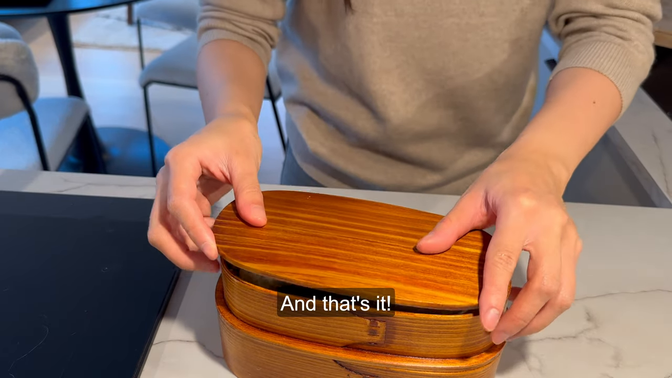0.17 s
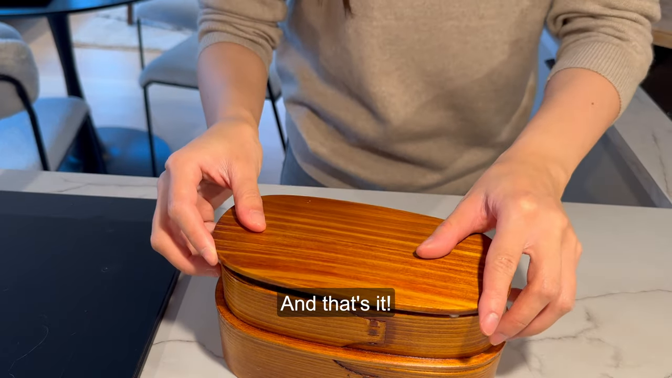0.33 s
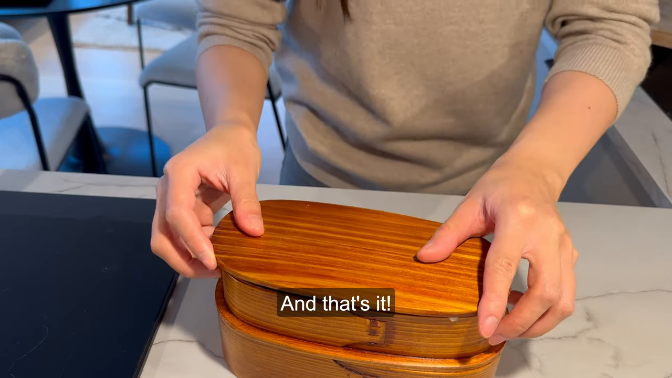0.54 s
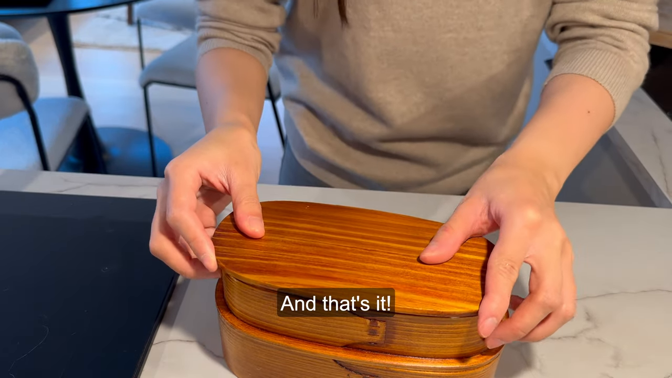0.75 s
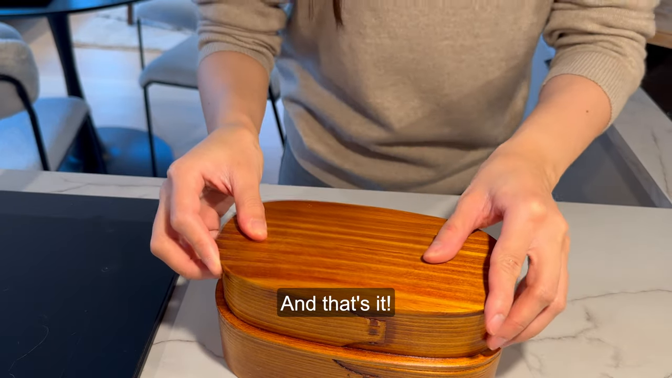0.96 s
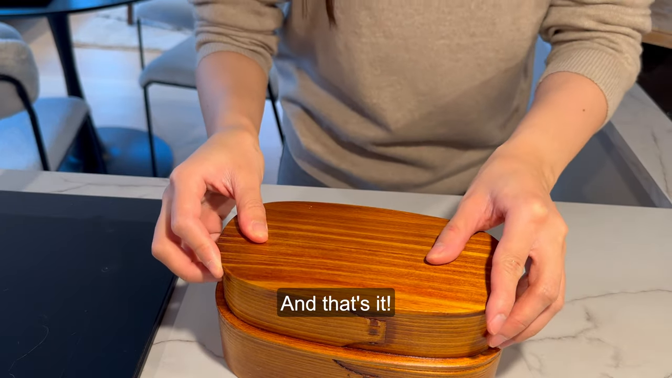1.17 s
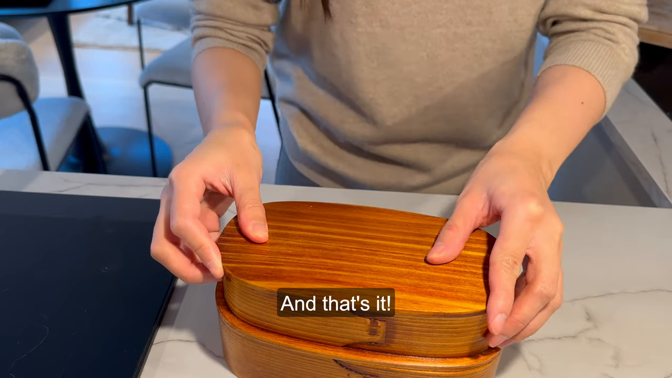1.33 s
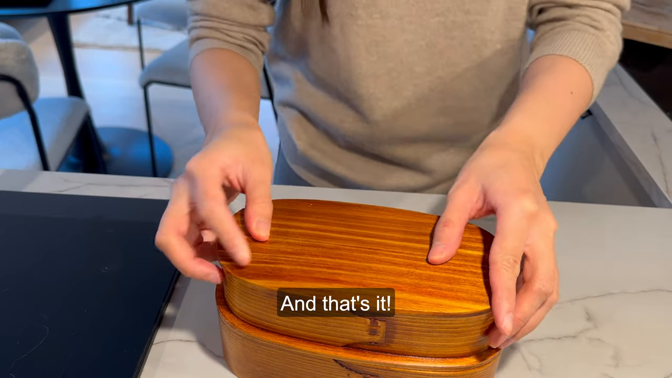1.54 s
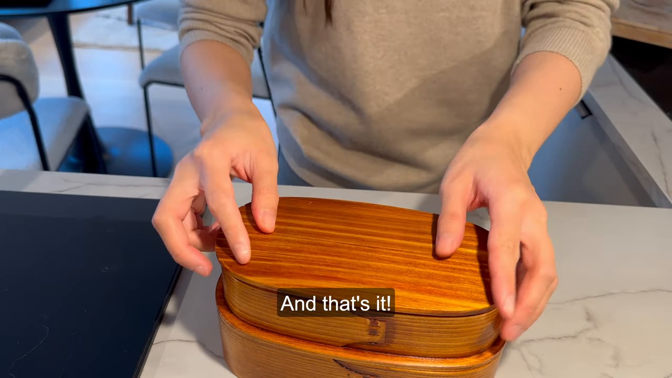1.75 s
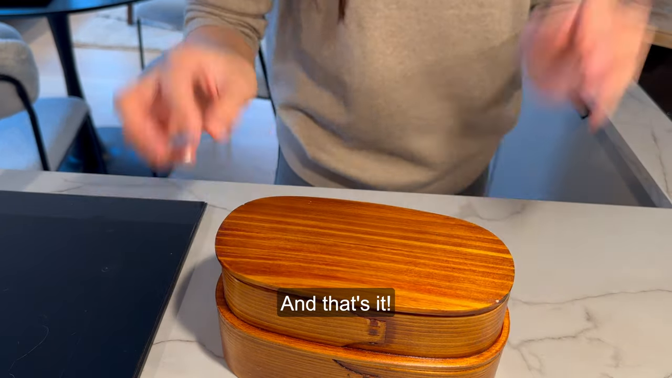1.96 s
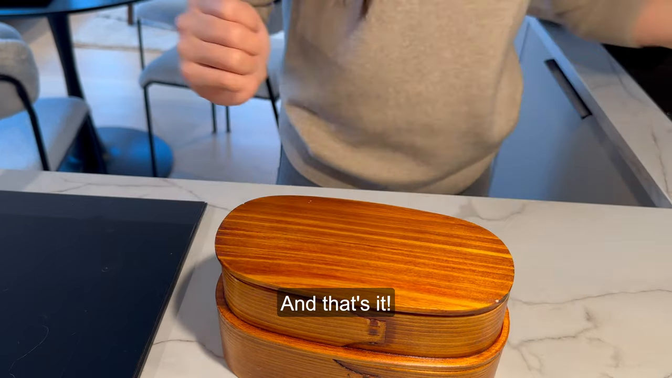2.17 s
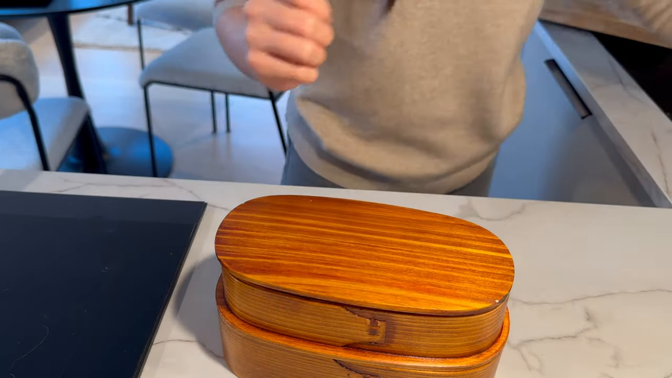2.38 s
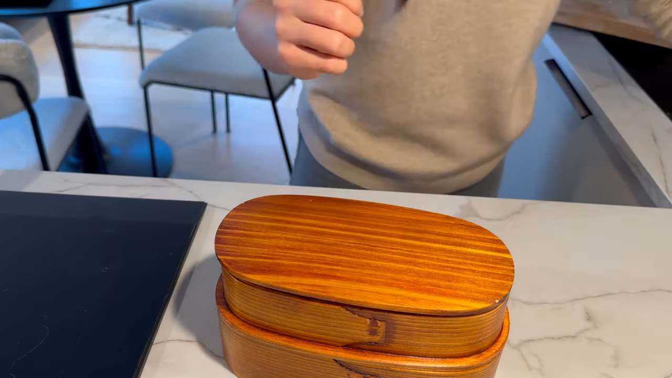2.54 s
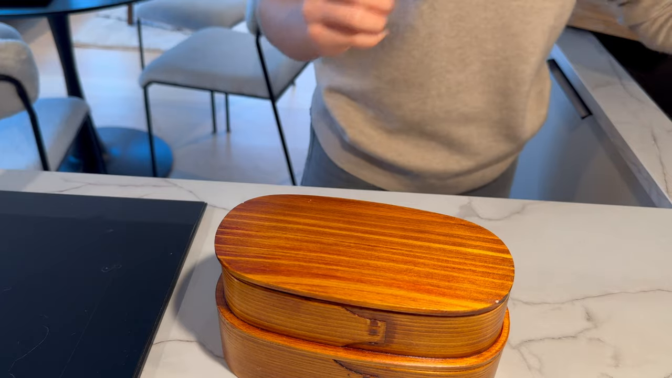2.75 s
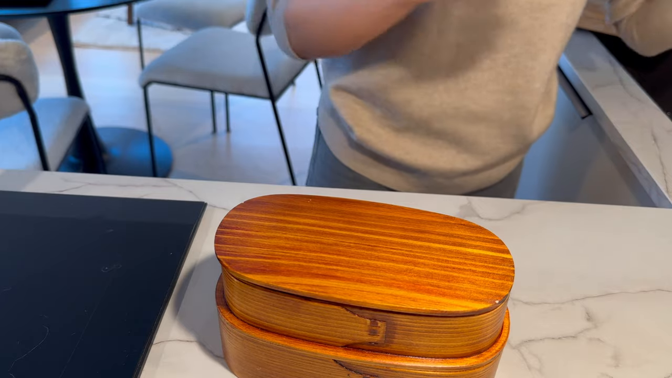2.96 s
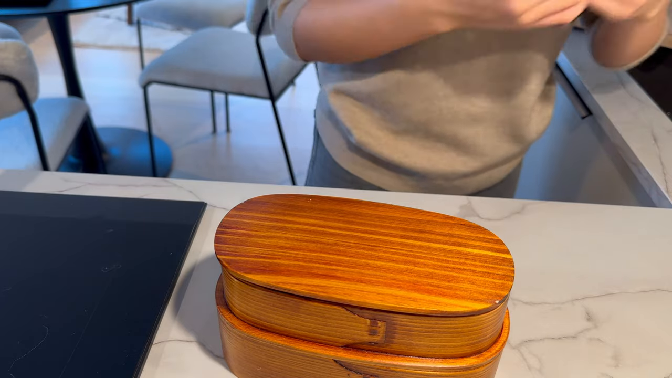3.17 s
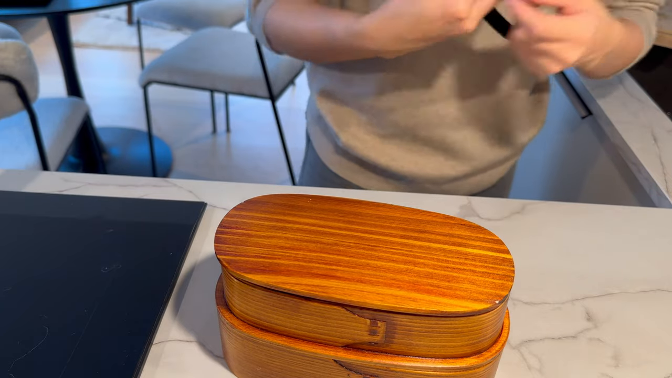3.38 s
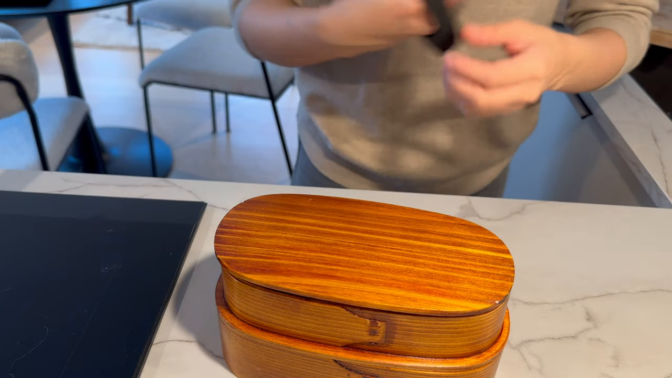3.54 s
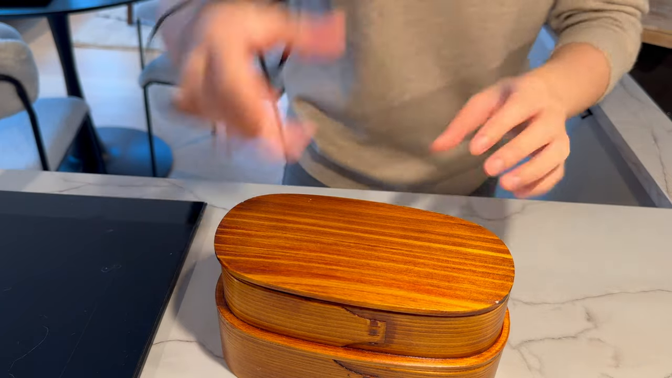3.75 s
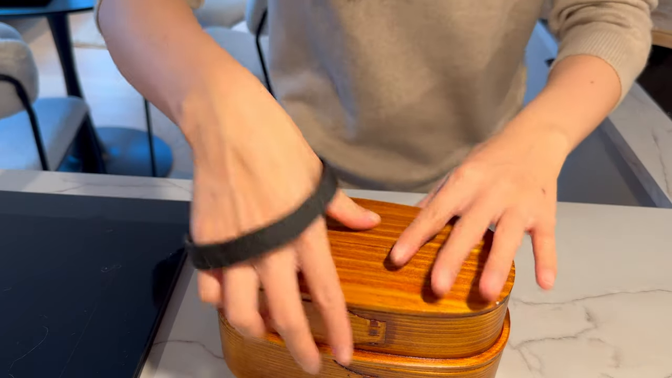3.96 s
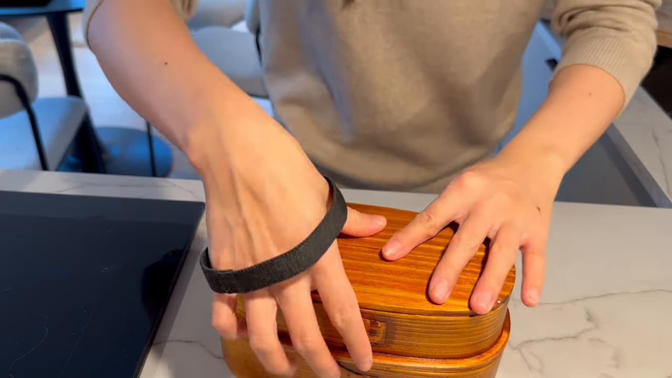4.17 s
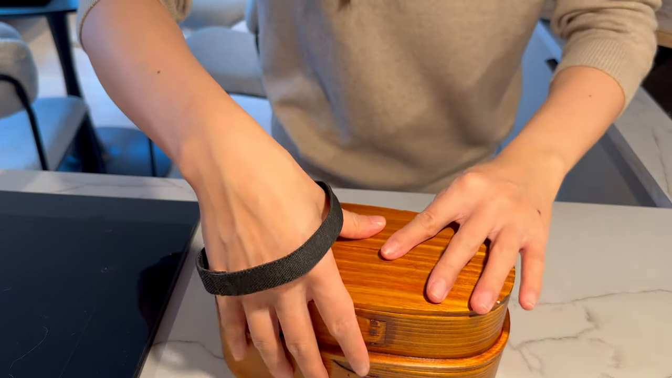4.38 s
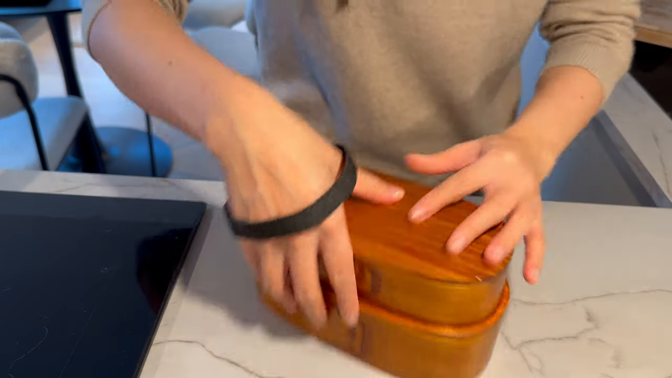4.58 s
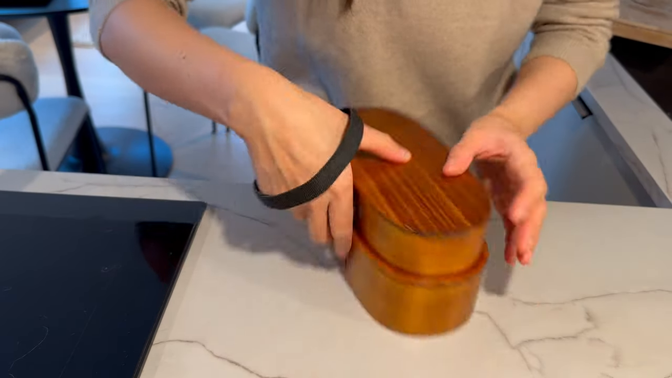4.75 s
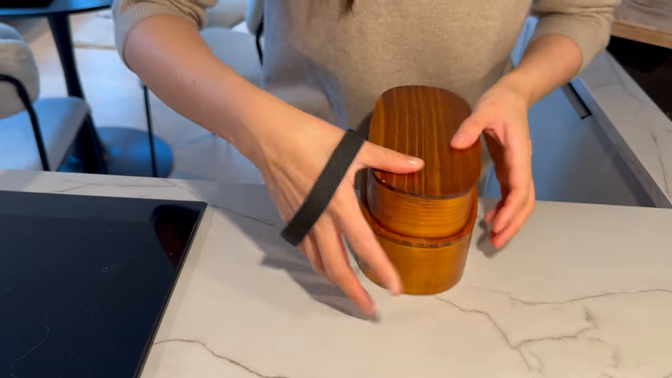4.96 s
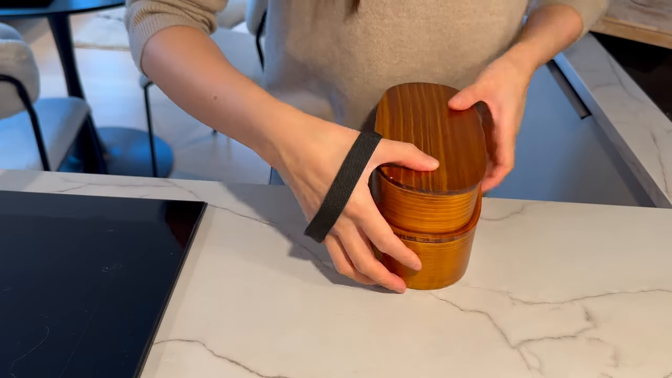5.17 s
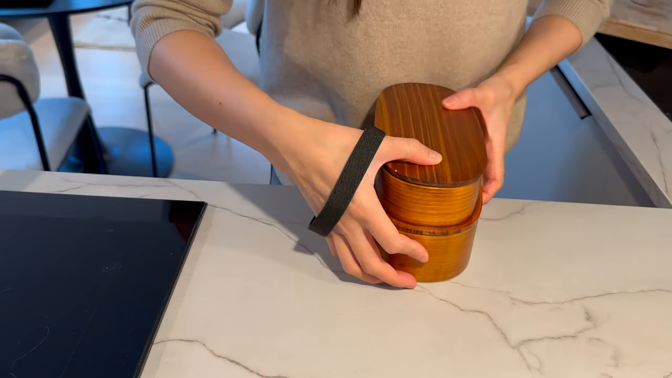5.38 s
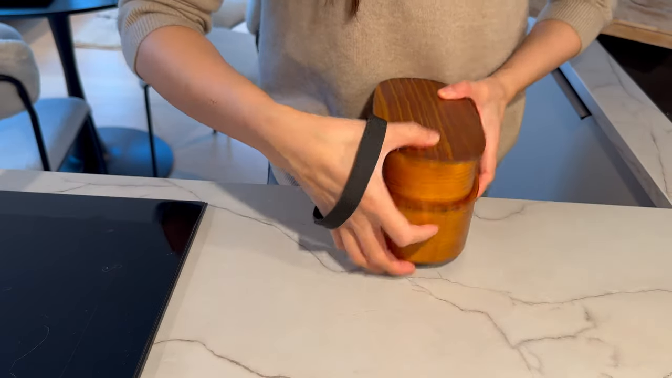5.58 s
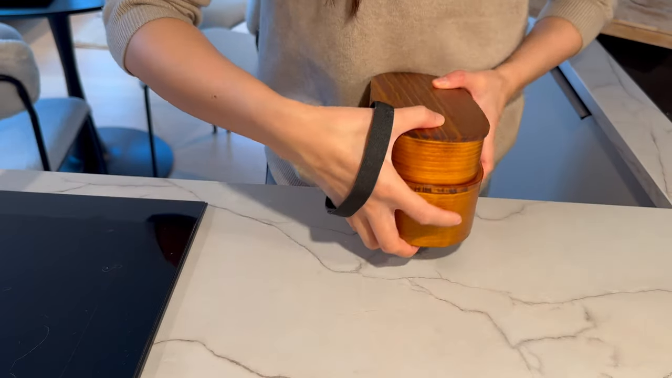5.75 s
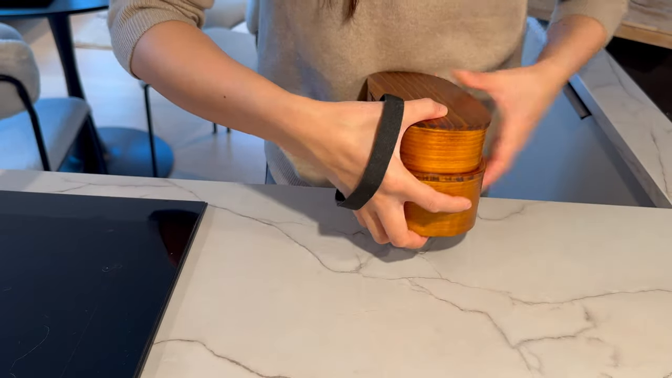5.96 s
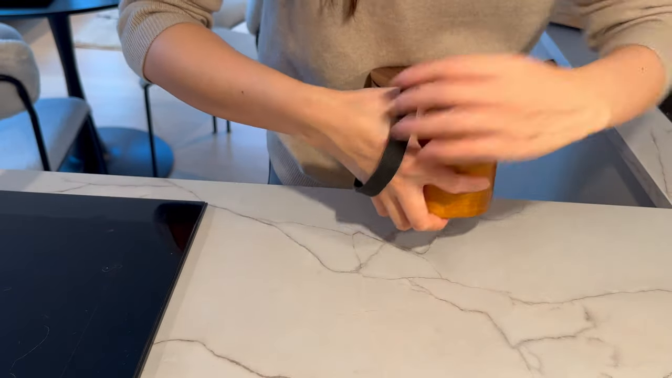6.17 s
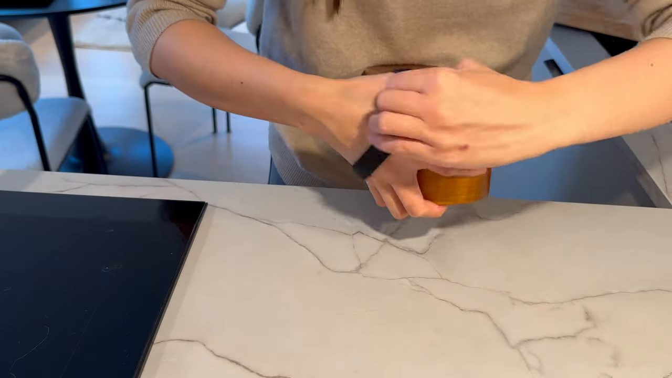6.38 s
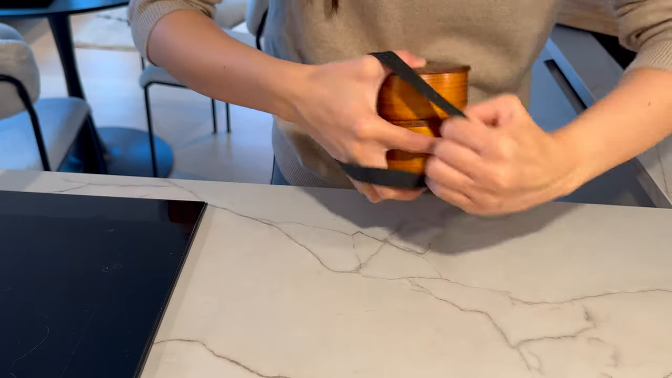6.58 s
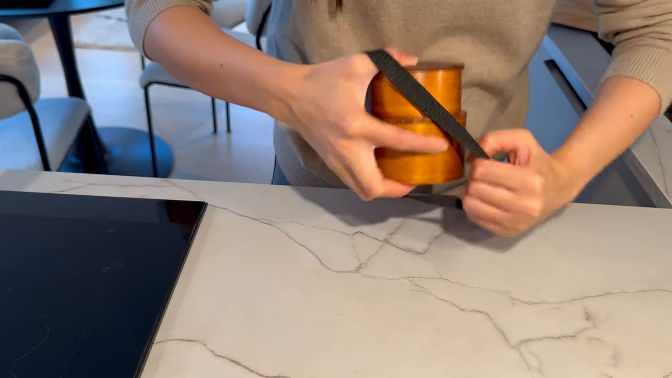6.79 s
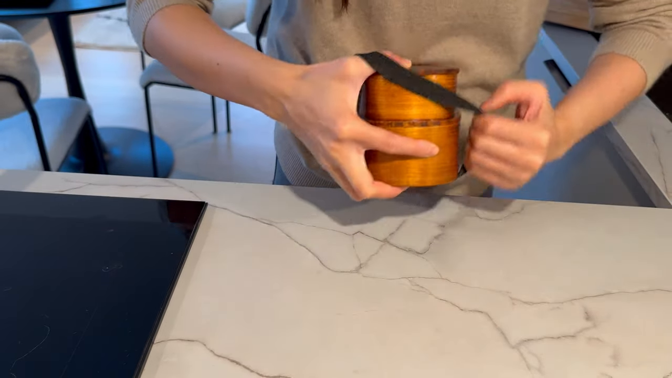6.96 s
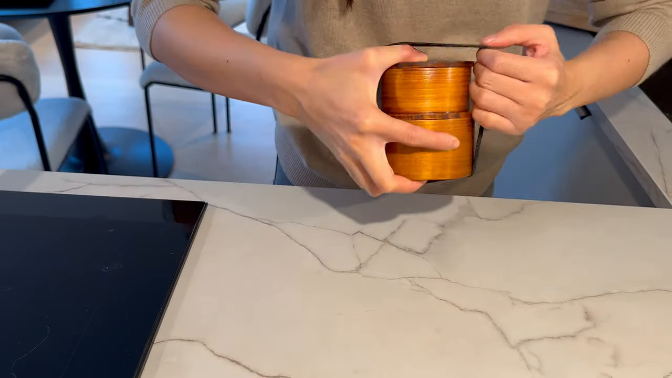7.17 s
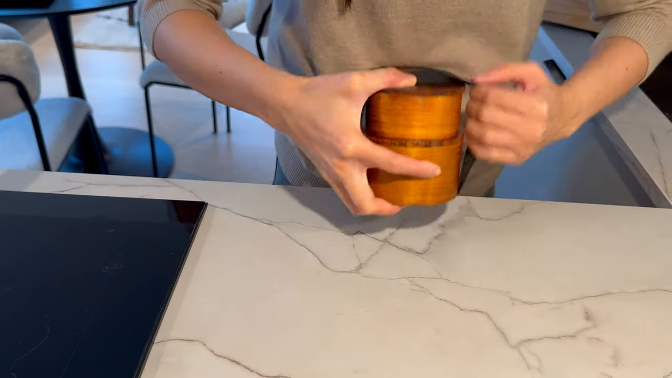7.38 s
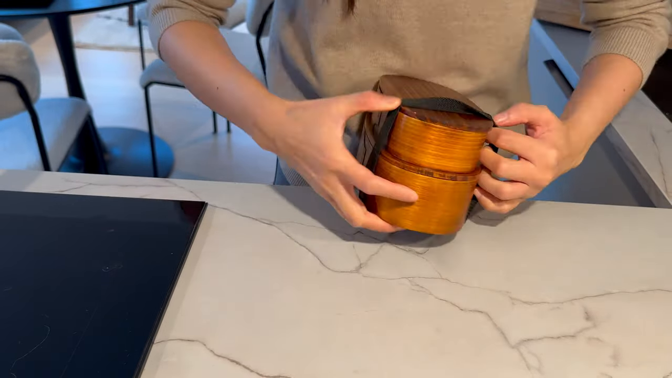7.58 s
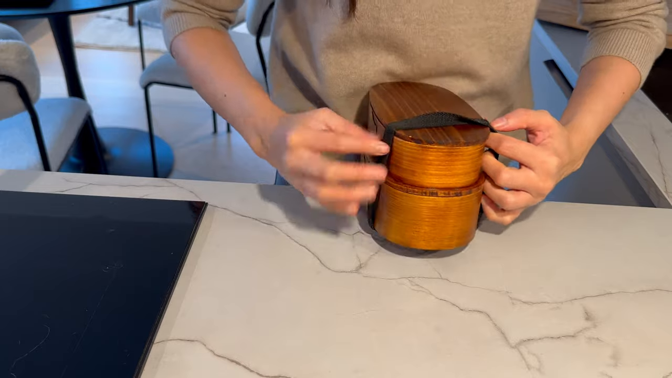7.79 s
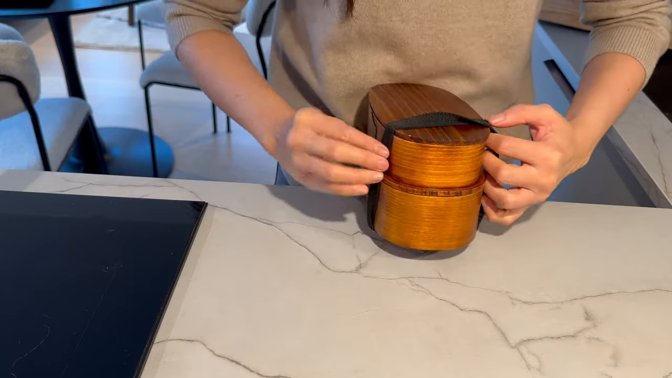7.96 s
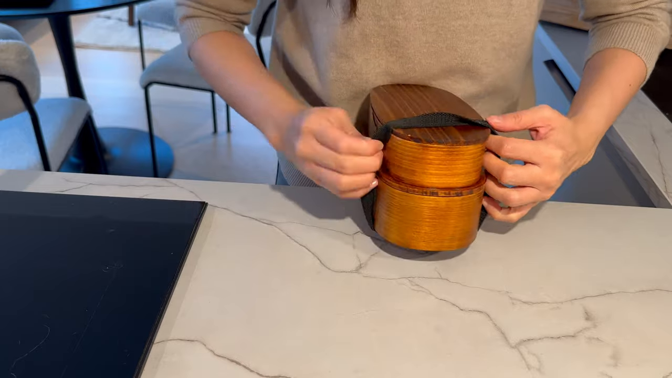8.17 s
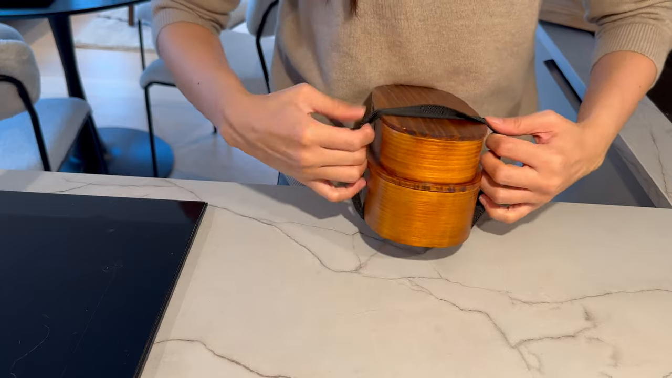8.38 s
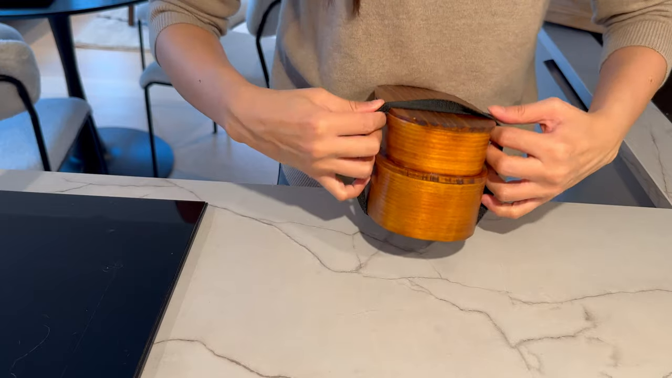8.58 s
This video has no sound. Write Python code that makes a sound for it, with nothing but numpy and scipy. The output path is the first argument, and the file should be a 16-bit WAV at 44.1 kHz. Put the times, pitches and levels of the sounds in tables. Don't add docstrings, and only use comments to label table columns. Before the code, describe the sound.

Close hollow wooden knocks and a hard lid clack, later a slap, scraping slide, elastic snap and heavy set-down over faint kitchen fan hum.

```python
import sys
import numpy as np
from scipy import signal
from scipy.fft import rfft, irfft, next_fast_len
from scipy.io import wavfile
from scipy.ndimage import uniform_filter1d, map_coordinates

SR = 44100
rng = np.random.default_rng(int(sys.argv[2]) if len(sys.argv) > 2 else 0)


def digitize_waveform(pressure):
    field = np.atleast_2d(pressure).T
    bounded = np.clip(field, -1, 1)
    quanta = np.round(bounded * 32767).astype(np.int16)
    wavfile.write(sys.argv[1], SR, quanta)


def decibels_to_gain(level_db):
    exponent = np.asarray(level_db, float) / 20
    return 10 ** exponent


N = 380583

# [f/Hz, density/dB per Hz]
FAN_SPECTRUM = [(88, -20), (150, -0.5), (254, -5.5), (285, -10.5), (308, -11), (333, 2), (408, -23),
                (436, -5.5), (559, 2), (618, -50), (676, 0), (774, -21), (980, -16.5), (1070, -5.5),
                (2200, -36), (2860, -64.5), (4840, -120)]
# [f/Hz, width/Hz, level/dB]
FAN_LINES = [(529, 4.7, -64), (727, 7.4, -66.5)]
# [f/Hz, density/dB per Hz]
RUMBLE_SPECTRUM = [(8.8, -36.5), (15, 6.5), (32, -3.5), (70, 5), (84, -5), (102, 2), (161, -13.5),
                   (200, -38), (260, -53), (440, -120)]
# [f/Hz, density/dB per Hz]
HISS_SPECTRUM = [(1000, -23.5), (1700, -18.5), (2520, -2), (2710, -10.5), (3040, -6.5), (3300, -10),
                 (5080, 0.5), (6540, -5.5), (7110, -7), (9590, -6.5), (10400, -5), (15200, -5.5),
                 (15900, -9.5)]
# [f/Hz, t60/s]
ROOM_DECAY = [(100, 0.31), (1200, 0.24), (5000, 0.14), (12000, 0.078)]
FAN_DB, HISS_DB, BUILDING_DB, SWAY_DB = -53.5, -72, -52, -60.5
SHAKE_DB, SHAKE_T60_S = -32, 0.94
KICK_DB, KICK_T60_S, KICK_RISE_S = -29.5, 1.5, 0.069
LIFTED_S = 5

# [f/Hz, density/dB per Hz]
SKIN_SPECTRUM = [(1000, -21.5), (1700, -1), (1840, -2), (2040, -7), (2170, -2), (2870, -0.5), (3310, -3),
                 (4250, -2), (5160, -0.5), (5640, 0), (6320, -9), (7130, -4), (8500, -58.5), (11000, -49.5),
                 (18700, -120)]
# [f/Hz, width/Hz, level/dB]
SKIN_RINGS = [(1850, 55, 3.5), (2090, 52, -7.5), (3280, 140, -2.5), (4045, 90, -1), (4500, 120, 0),
              (5160, 190, 5), (5750, 97, 4), (6960, 230, 2.5)]
# [f/Hz, density/dB per Hz]
AIRY_SPECTRUM = [(4410, -18), (7500, 4.5), (8970, -1), (15100, 1), (15900, -2)]
# [f/Hz, width/Hz, level/dB]
RUBBED_WALLS = [(1060, 100, -2.5), (1190, 75, -0.5), (1260, 42, 5), (1410, 130, -4.5)]
# [f/Hz, width/Hz, level/dB]
RUBBED_HOLLOW = [(230, 22, -1.5), (335, 82, -2.5), (408, 55, 4.5), (560, 130, 0.5), (642, 120, 2),
                 (815, 270, -5)]
# skin, airy, wall, hollow [level/dB]
RESTING_DB = [-74.5, -79, -62, -59]
# [peak t/s, rise/s, fall/s, hiss level/dB, wood/dB re hiss]
HAND_STROKES = [(0.0, .1, 0.25, -61, 4), (.344, 0.028, 0.046, -60, 21.5), (.41, 0.027, 0.33, -62.5, 16.5),
                (.695, .005, 0.064, -54, 7.5), (.716, 0.013, 0.022, -47, 6),
                (.757, 0.015, 0.093, -34.5, 3.5), (.815, .04, .07, -52.5, 3), (.885, 0.014, 0.035, -39, 3),
                (.97, .08, 0.044, -52, 0.5), (3.85, 0.028, 0.18, -52, -11),
                (4.005, 0.073, 0.086, -56.5, 20.5), (4.19, 0.093, 0.098, -66, 13.5),
                (4.265, 0.11, 0.054, -54, 2), (4.96, 0.51, 0.124, -59, 15), (5.11, 0.034, 0.033, -50, 7),
                (5.22, 0.16, 0.25, -57.5, 10.5), (5.36, 0.18, 0.18, -52, 9.5),
                (5.65, 0.042, 0.17, -60.5, -6), (5.74, 0.19, 0.087, -55, 2), (5.89, 0.17, 0.047, -48.5, 3),
                (7.31, .03, .1, -65.5, 15.5), (7.375, 0.092, 0.2, -45.5, 2.5), (7.42, 0.11, 0.25, -45.5, 3),
                (7.5, 0.12, 0.078, -71, 10), (7.63, 0.061, 0.17, -51.5, 5), (7.69, 0.018, 0.39, -68, 18.5),
                (7.85, 0.61, 1, -57, 4), (8.32, 0.13, 0.28, -54.5, 7), (8.59, 0.078, 0.18, -54, 5)]
# [peak t/s, rise/s, fall/s, hiss level/dB, wood/dB re hiss]
CLOTH_STROKES = [(1.37, 0.078, 0.4, -65.5, 2.5), (1.57, 0.296, 0.32, -69, 8), (1.95, 0.15, .3, -72, 10),
                 (3.36, 0.2, 0.44, -63.5, -18), (4.09, 0.039, 0.026, -55, 5.5),
                 (5.07, 0.26, 0.091, -52, -25), (5.555, 0.085, 0.061, -49.5, -1),
                 (5.865, 0.077, 0.047, -52, 3), (6.46, 0.47, 0.66, -58, -2),
                 (6.66, 0.088, 0.031, -48.5, -2), (6.78, 0.21, 0.38, -48.5, -3.5),
                 (6.96, 0.12, 0.16, -53, 0), (7.0, 0.014, 0.052, -40, 5.5), (7.04, .03, 0.062, -54, 9),
                 (7.173, 0.0048, 0.019, -46, 8.5), (7.2, 0.081, 0.16, -63, 6),
                 (7.215, 0.0055, .015, -47, 7), (7.26, 0.056, 0.11, -57, 2.5)]
# [t/s, hiss level/dB]
PRICKS = [(.327, -57), (.36, -58), (.573, -66), (.695, -45.5), (5.0978, -43), (5.119, -48.5), (5.2786, -63),
          (6.625, -49.5), (6.658, -43), (6.684, -51), (6.802, -51), (6.839, -45), (6.912, -53),
          (7.017, -42), (7.281, -62), (7.2945, -56), (7.309, -57), (7.325, -54.5), (7.358, -44.5),
          (7.794, -56), (7.806, -47), (8.222, -48.5), (8.275, -49.5), (8.3221, -56)]
# [t/s, friction level/dB]
SLIDES = [
    [(4.3, -63), (4.325, -64), (4.345, -52), (4.4, -42.5), (4.43, -42), (4.56, -41), (4.66, -38.5),
     (4.75, -39), (4.8, -41.5), (4.9, -48.5), (4.98, -70)],
    [(8.04, -60.5), (8.066, -54), (8.09, -44.5), (8.15, -43), (8.195, -42.5), (8.21, -48), (8.24, -45),
     (8.256, -50.5), (8.3, -64)],
]
HAND_AIRY_DB, CLOTH_AIRY_DB, SLIDE_AIRY_DB = -9, -5, -6.5
HOLLOW_DB, SLIDE_HOLLOW_DB = -1.5, -4
SLIDE_WOOD_DB = (4, 0.5)
BRIGHTENS = 0.4
PRICK_RISE_S, PRICK_FALL_S, PRICK_AIRY_DB, PRICK_WOOD_DB = 0.0024, 0.01, -4, -3.5
RATTLE_DB, RATTLE_T60_S, RATTLE_LAG_S = -31.5, 0.48, 0.034
# skin, airy, wall, hollow [level/dB]
RATTLE_SHARE_DB = [-18, -39.5, 0, -4]

# [t/s, level/dB, lower mode/dB re upper, third mode/dB re upper]
THUMPS = [(0.308, -26.5, -25, -8), (0.37, -28, -8, 0), (0.439, -20, -7, -21), (0.48, -23, 0.5, -15),
          (0.519, -25, -21, -26), (0.792, -10, 2, -21), (0.894, -10, 5.5, -4.5), (3.862, -34.5, 10, -11),
          (3.929, -26, 2.5, 5.5), (4.111, -42, 3, -5), (4.439, -46, 4, -3), (4.6, -39, 4, -2),
          (5.13, -34, -1, 2), (5.296, -34, 5.5, 2), (5.44, -29.5, -4, -5), (7.4827, -17.5, -12, 5.5),
          (7.6528, -4, -8, -4), (8.398, -35.5, -31, -1.5)]
# [f/Hz, t60/s]
COUNTER_MODES = [(108, .25), (82.4, 0.25), (234, 0.081)]
LIFTED_COUNTER_HZ, LIFTED_COUNTER_T60_S = 114.1, 0.26

# [f/Hz, level/dB]
HOLLOW_MODES = [(230, -9), (300, -0.5), (390, 5), (500, 0.5), (590, 3.5), (660, -2), (815, -0.5)]
# [t/s, level/dB, favoured f/Hz, t60/s]
BUMPS = [(0.082, -24, 397, 0.019), (0.3021, -17.5, 393, 0.032), (0.395, -18.5, 402, 0.077),
         (0.432, -12, 390, 0.027), (0.476, -26, 275, 0.098), (0.693, -21.5, 678, 0.028),
         (0.7498, -14, 800, 0.015), (0.771, -4, 388, 0.028), (0.884, -1.5, 473, 0.037),
         (3.859, -7.5, 340, 0.02), (3.926, -19.5, 236, 0.16), (4.887, -11.5, 340, 0.02),
         (5.097, -21, 283, 0.03), (5.295, -19.5, 350, 0.042), (5.329, -29, 288, 0.04),
         (5.44, -25.5, 232, 0.045), (5.877, -24, 233, 0.044), (6.38, -30, 396, 0.086),
         (6.433, -23.5, 527, 0.083), (6.656, -21.5, 300, 0.03), (6.994, -47, 361, 0.032),
         (7.486, -11, 300, 0.035), (8.239, -19, 447, 0.023)]
# [t/s, level/dB, centre f/Hz, length/ms]
TICKS = [(0.7712, -32, 2650, 0.8), (0.7903, -24, 3100, 1), (0.7908, -36, 5050, 1.8), (0.7905, -41, 9500, 1),
         (0.7525, -48, 5380, 4), (0.885, -43, 5190, 4), (0.893, -44, 3000, 1.2), (0.972, -60, 2690, 3),
         (3.8298, -40, 2250, 1), (3.8932, -53, 2300, 1.5), (3.947, -50, 2250, 3), (3.966, -51, 2300, 4),
         (4.012, -52, 1950, 3), (4.165, -72, 2850, 20), (4.23, -70, 3000, 14), (5.53, -64, 7100, 18),
         (5.535, -63, 5400, 16), (4.0916, -53, 6810, 2.3), (4.7497, -46, 3457, 2.3), (5.084, -57, 7100, 3),
         (7.657, -38, 1850, 2), (8.2415, -47, 4500, 1), (7.309, -57, 11200, 2), (7.3729, -44, 5100, 2.4),
         (7.71, -51, 4960, 1.9)]
# [t/s, level/dB]
SNAPS = [
    (6.998, -10.5),
    (7.017, -20.5),
]
# [f/Hz, level/dB, t60/s]
PINCHED_MODES = [(594, -15, 0.14), (1116, 4, 0.047), (1530, 2.5, 0.027)]

# [f/Hz, level/dB, share of t60]
WALL_MODES = [(1032, 0, 0.98), (1143, -11, .8), (1190, -1, 1), (1255.4, 3, 1), (1510, -5, 0.14)]
# [f/Hz, width/Hz, level/dB]
CRACK_RESONANCES = [(1870, 60, -7), (2240, 330, 4), (2680, 350, 0), (2940, 600, -2.5), (3580, 910, 0),
                    (4500, 400, 0), (5400, 420, 2), (6620, 1400, -8.5), (11000, 8300, -25)]
# [t/s, ring level/dB, favoured f/Hz, crack/dB re ring, ring t60/s]
LID_KNOCKS = [(0.083, -43, 1030, -16, 0.048), (0.3026, -27, 1210, -33, .06), (0.322, -49, 1220, -24, .05),
              (0.343, -49.5, 1220, -5, .12), (0.395, -31, 1210, -22, 0.07),
              (0.4016, -29.5, 1270, -18.5, 0.075), (0.4087, -36, 1240, -16.5, 0.05),
              (0.4345, -26, 1220, -22, 0.049), (0.4787, -34.5, 1270, -17, 0.11),
              (0.5085, -32, 1260, -18.5, 0.078), (0.575, -50.5, 1250, -12, .04),
              (0.693, -31.5, 1320, -16, .025), (0.7505, -18.5, 1150, -22.5, .07),
              (0.7714, -21.5, 1017, -12.5, .07), (0.78, -18, 1240, -26.5, .05),
              (0.788, -12, 1290, -9, 0.034), (0.7967, -12, 1270, -35.5, 0.025),
              (0.8797, -19, 1150, -14, 0.034), (0.884, -13, 1260, -22.5, 0.045),
              (0.891, -13.5, 1250, -19.5, 0.052), (1.3675, -51.5, 1366, -7, .05)]
# [t/s, ring level/dB, favoured f/Hz, crack/dB re ring, ring t60/s]
TAP_KNOCKS = [(3.8297, -13, 1150, -16, 0.022), (3.8588, -14, 1220, -35, 0.032),
              (3.8932, -23.5, 1200, -18.5, 0.016), (3.9263, -16, 1260, -8.5, 0.04),
              (3.9442, -20, 1240, -29, 0.02), (3.9765, -23.5, 1260, -31, 0.029),
              (3.988, -26, 1260, -30, 0.086), (4.022, -22.5, 1260, -31, 0.08),
              (4.336, -30.5, 1290, -22, 0.085), (4.5942, -22, 1190, -14, 0.036),
              (4.8889, -22.5, 1140, -22, 0.096), (5.0998, -25.5, 1250, -25, 0.021),
              (5.1076, -27.5, 1160, -29, 0.031)]
# [t/s, ring level/dB, favoured f/Hz, crack/dB re ring, ring t60/s]
GRIT_CATCHES = [(4.3563, -36, 1250, -14, 0.043), (4.3787, -40, 1230, -5, .04),
                (4.4231, -29, 1250, -12.5, 0.049), (4.458, -34, 1270, -17, 0.031),
                (4.5164, -40, 1250, -21, .04), (4.5304, -24.5, 1230, -16, .04),
                (4.6162, -23.5, 1250, -24, 0.032), (4.632, -24.5, 1260, -20.5, 0.036),
                (4.656, -26.5, 1270, -21, 0.056), (4.7, -26.5, 1230, -22, 0.045),
                (4.7344, -30, 1250, -12, 0.047)]
# [t/s, ring level/dB, favoured f/Hz, crack/dB re ring, ring t60/s]
HELD_KNOCKS = [(6.4328, -47, 1060, -25, 0.1), (6.656, -39, 1290, -19, 0.12),
               (6.855, -39.5, 1250, -4, 0.088), (6.8837, -40.5, 1310, -0.5, 0.039),
               (6.9968, -25, 1140, -11, 0.018), (7.1712, -45.5, 1050, -2, .034),
               (7.214, -47, 1076, -5.5, 0.045), (7.257, -47.5, 1210, 0, 0.046),
               (7.656, -12.5, 1230, -16.5, 0.023), (8.2421, -32, 1250, -10, 0.079),
               (8.398, -33, 1360, -21, 0.017)]
# [t/s, ring level/dB, favoured f/Hz,
# crack/dB re ring, ring t60/s]
FURTHER_KNOCKS = [(3.9515, -21, 1250, -40, 0.026), (3.969, -41, 1400, -22, .03),
                  (4.006, -42, 1250, -27, 0.026), (4.013, -28, 1200, -24, .03),
                  (4.7505, -32, 1250, -19, .04), (7.384, -38, 1205, -25, .04),
                  (7.417, -31.5, 1250, -25, 0.036), (7.444, -30, 1100, -25, .04),
                  (7.7, -22.5, 1350, -30, 0.023), (7.712, -22.5, 1250, -26, 0.044),
                  (8.072, -40, 1250, -20, .05), (8.1, -34, 1250, -16.5, 0.036)]
LID_MS, TAP_MS, CATCH_MS, HELD_MS = 3.2, 2.5, 4.8, 2.6
MIDDLING_DB, LINGERS = -31, 0.2
SWELL, REBOUND_SIZE = 0.3, 0.3

# [t/s, level/dB, swell/ms]
BLOWS = [
    (0.7899, -3.5, .5),
    (3.9274, -1.5, 2.1),
    (7.6559, 0, 0.92),
]
# [f/Hz, level/dB, t60/s]
LID_HOME_MODES = [(236, -23, .11), (422, 4.5, 0.027), (405, -21.5, .14), (559, -21, 0.14),
                  (675, -11.5, 0.096), (813, -9.5, 0.091), (900, -25.5, 0.11), (1279, 2, 0.05),
                  (1250, -18.5, 0.07), (2226, -23.5, 0.094), (2430, -1, 0.012), (3120, -16.5, 0.0043)]
# [f/Hz, level/dB, t60/s]
LID_SLAP_MODES = [(241, -31, 0.13), (326, -16, 0.043), (403, -33, 0.15), (487, -29, 0.14),
                  (633, -13.5, 0.038), (1020, -12, 0.067), (1244, 2.5, 0.051), (1205, -11, 0.074),
                  (2170, -11.5, 0.021), (2360, -38, 0.13), (2805, -18, 0.021), (3380, -34, 0.01),
                  (1450, -23, 0.07)]
# [f/Hz, level/dB, t60/s]
SET_DOWN_MODES = [(225.6, -21, 0.2), (291, -3, 0.065), (363, -5.5, 0.086), (512, -3, 0.025),
                  (592, 4.5, 0.02), (652, -6.5, 0.06), (745, 0, .025), (930, -9.5, 0.08), (1078, -12, .12),
                  (1218, 2, .035), (1186, -24.5, 0.41), (1292, -14.5, 0.2), (1600, -25.5, 0.12),
                  (1826, -18.5, 0.043)]


def unit(x):
    return x / np.sqrt(np.mean(x ** 2) + 1e-20)


def along(points, hz):
    f, v = np.transpose(points)
    return np.interp(np.log(hz + 1), np.log(f + 1), v)


def add_at(out, s, x):
    out[round(s * SR):][:len(x)] += x


def wobble(rate_hz):
    knots = rng.standard_normal(int(N * rate_hz / SR) + 4)
    return map_coordinates(knots, [np.arange(N) * rate_hz / SR])


def filtered(x, response):
    m = next_fast_len(N + SR // 2)
    return irfft(rfft(x, m) * response(np.fft.rfftfreq(m, 1 / SR)), m)[..., :N]


def resonances(peaks):
    def response(f):
        total = 0
        for k, (hz, width, db) in enumerate(peaks):
            total = total + (-1) ** k * decibels_to_gain(db) * 1j * f * width / (hz * hz - f * f + 1j * f * width)
        return total
    return response


def shaped(spectrum):
    return lambda hz: decibels_to_gain(along(spectrum, hz))


def grit(response, rate_hz, grain_db, patchy_db=0.66):
    z = signal.stft(rng.standard_normal(N + 512), nperseg=512)[2]
    field = uniform_filter1d(rng.standard_normal(z.shape), size=5, axis=0)
    field = uniform_filter1d(field, size=14, axis=1)
    noise = signal.istft(z * decibels_to_gain(patchy_db * unit(field)), nperseg=512)[1][:N]
    return unit(filtered(noise * decibels_to_gain(grain_db * wobble(rate_hz)), response))


def decaying(hz, db, t60, t):
    return decibels_to_gain(db - 60 * t / t60) * np.sin(2 * np.pi * hz * t)


def ring(modes, t, favoured_hz, spread_db, luck_db):
    x = 0
    for (hz, db, t60), luck in zip(modes, luck_db):
        x = x + decaying(hz, db + luck - spread_db * abs(np.log2(hz / favoured_hz)), t60, t)
    return x / np.abs(x).max()


def dying(events, t60, rise_s):
    events = np.array(events)
    t = np.clip(np.arange(N) / SR - events[:, :1], 0, None)
    level = decibels_to_gain(events[:, 1:2] - 60 * t / t60) * (1 - np.exp(-t / rise_s))
    return np.sum(level ** 2, 0)


def kitchen():
    fan = decibels_to_gain(FAN_DB + 0.74 * wobble(2.7)) * grit(shaped(FAN_SPECTRUM), 21, 0.6)
    for hz, width, db in FAN_LINES:
        fan = fan + decibels_to_gain(db) * grit(resonances([(hz, width, 0)]), 12, 1.2)
    pushes = [row[:2] for row in THUMPS]
    landings = [row for row in pushes if row[0] > LIFTED_S]
    shake = decibels_to_gain(SHAKE_DB) ** 2 * dying(pushes, SHAKE_T60_S, 0.02)
    kick = decibels_to_gain(KICK_DB) ** 2 * dying(landings, KICK_T60_S, KICK_RISE_S)
    building = np.sqrt(decibels_to_gain(BUILDING_DB) ** 2 + shake) * grit(shaped(RUMBLE_SPECTRUM), 3.2, 1)
    sway = np.sqrt(decibels_to_gain(SWAY_DB) ** 2 + kick) * grit(resonances([(26.76, 2.5, 0)]), 2.96, 0.83)
    hiss = decibels_to_gain(HISS_DB) * grit(shaped(HISS_SPECTRUM), 8, 0.4)
    return fan + decibels_to_gain(5) * building + decibels_to_gain(6) * sway + hiss


def room(x):
    out = np.zeros(N + SR)
    for start in range(0, N, SR // 3):
        hz, t, z = signal.stft(rng.standard_normal(SR // 2), SR, nperseg=256)
        decay = decibels_to_gain(-60 * t / along(ROOM_DECAY, hz)[:, None])
        tail = signal.istft(z * decay, SR, nperseg=256)[1]
        echo = signal.fftconvolve(x[start:start + SR // 3], tail / np.linalg.norm(tail))
        out[start + 200:][:len(echo)] += echo
    return out[:N]


def friction():
    t = np.arange(N) / SR
    power = np.tile(decibels_to_gain(RESTING_DB)[:, None] ** 2, N)

    def share(airy_db, wood_db):
        return decibels_to_gain([0, airy_db, wood_db, wood_db + HOLLOW_DB])[:, None]

    pricks = [(s, PRICK_RISE_S, PRICK_FALL_S, db, PRICK_WOOD_DB) for s, db in PRICKS]
    strokes = [(HAND_STROKES, HAND_AIRY_DB), (CLOTH_STROKES, CLOTH_AIRY_DB), (pricks, PRICK_AIRY_DB)]
    for rows, airy_db in strokes:
        for s, rise, fall, db, wood_db in rows:
            near = slice(max(0, round((s - 2 * rise) * SR)), round((s + 2 * fall) * SR))
            stroke = decibels_to_gain(db - 20 * np.maximum((s - t[near]) / rise, (t[near] - s) / fall))
            power[:, near] += (stroke * share(airy_db, wood_db)) ** 2

    for rows, wood_db in zip(SLIDES, SLIDE_WOOD_DB):
        s, db = np.transpose(rows)
        drag_db = np.interp(t, s, db, -120, -120)
        brighter_db = np.outer([0, BRIGHTENS, 0, 0], drag_db - db.max())
        hollow = decibels_to_gain([[0], [0], [0], [SLIDE_HOLLOW_DB]])
        power += (decibels_to_gain(drag_db + brighter_db) * share(SLIDE_AIRY_DB, wood_db) * hollow) ** 2

    knocked = [*LID_KNOCKS, *TAP_KNOCKS, *HELD_KNOCKS, *BLOWS]
    hard = [row[:2] for row in knocked if row[1] > -16]
    rattle = decibels_to_gain(RATTLE_DB + np.array(RATTLE_SHARE_DB)[:, None])
    power += dying(hard, RATTLE_T60_S, RATTLE_LAG_S) * rattle ** 2
    return np.sqrt(power)


def rubbing():
    def skin(f):
        return shaped(SKIN_SPECTRUM)(f) * (1 + np.abs(resonances(SKIN_RINGS)(f)))

    layers = [grit(skin, 400, 2, 2.2),
              grit(shaped(AIRY_SPECTRUM), 400, 1.5, 1),
              grit(resonances(RUBBED_WALLS), 150, 1.3, 1),
              grit(resonances(RUBBED_HOLLOW), 120, 1.5, 1)]
    return np.sum(friction() * layers, 0) * decibels_to_gain(1.2 * wobble(40))


def thumps():
    out, t = np.zeros(N + SR), np.arange(SR // 2) / SR
    in_step_s, swell_s = 0.0085, 0.011
    for s, db, lower_db, third_db in THUMPS:
        counter = list(COUNTER_MODES)
        if s > LIFTED_S:
            counter[0] = (LIFTED_COUNTER_HZ, LIFTED_COUNTER_T60_S)
        modes = 0
        for (hz, t60), level in zip(counter, (0, lower_db, third_db)):
            modes = modes + decibels_to_gain(db + level - 60 * t / t60) * np.sin(2 * np.pi * hz * (in_step_s - t))
        add_at(out, s, modes * (1 - np.exp(-(t / swell_s) ** 2)))
    return out[:N]


def ticks():
    out, t = np.zeros(N + SR), np.arange(SR // 10) / SR
    for s, db, hz, ms in TICKS:
        u = t * 1000 / ms
        noise = unit(uniform_filter1d(rng.standard_normal(len(t)), size=round(7 * SR / hz)))
        add_at(out, s, decibels_to_gain(db + 22.5) * u * np.exp(-u) * noise * np.sin(2 * np.pi * hz * t))
    return out[:N]


def band():
    out, t = np.zeros(N + SR), np.arange(SR // 4) / SR
    slap = ring(PINCHED_MODES, t, 1100, 0, (0, 0, 0)) * (1 - np.exp(-t / 0.0019))
    for s, db in SNAPS:
        add_at(out, s, decibels_to_gain(db) * slap)
    return out[:N]


def bumps():
    out, t = np.zeros(N + SR), np.arange(SR // 4) / SR
    for s, db, favoured_hz, t60 in BUMPS:
        modes = [(hz, level, t60 * np.sqrt(400 / hz)) for hz, level in HOLLOW_MODES]
        body = ring(modes, t, favoured_hz, 12, rng.standard_normal(len(modes)))
        add_at(out, s + 0.0015, decibels_to_gain(db) * body * (1 - np.exp(-t / 0.0013)))
    return out[:N]


def all_knocks():
    grips = [(LID_KNOCKS, LID_MS), (TAP_KNOCKS, TAP_MS), (GRIT_CATCHES, CATCH_MS),
             (HELD_KNOCKS, HELD_MS), (FURTHER_KNOCKS, HELD_MS)]
    return [(*row, ms * decibels_to_gain(LINGERS * (row[1] - MIDDLING_DB))) for rows, ms in grips for row in rows]


def knocks():
    box, cracks, t = np.zeros(N + SR), np.zeros(N + SR), np.arange(SR // 4) / SR
    for s, db, favoured_hz, crack_db, t60, ms in all_knocks():
        rough = rng.standard_normal(SR // 20)
        fade = np.exp(-t[:len(rough)] * 1000 / ms)
        contact = REBOUND_SIZE * fade * (rough > 1.9) * rough
        contact[0] += 2
        modes = [(hz, level, share * t60) for hz, level, share in WALL_MODES]
        walls = ring(modes, t, favoured_hz, 19, rng.standard_normal(len(modes)))
        walls = signal.fftconvolve(walls, contact)[:len(t)] * (1 - np.exp(-t * 1000 / (SWELL * ms)))
        add_at(box, s, decibels_to_gain(db) * walls / np.abs(walls).max())
        add_at(cracks, s, decibels_to_gain(db + crack_db + 19) * rough * fade ** 2 * (1 - fade ** 8))

    def soft(f):
        return 1 / (1 + 1.2j * f / 1700 - (f / 1700) ** 2) ** 2

    return filtered(box[:N], soft) + filtered(cracks[:N], resonances(CRACK_RESONANCES))


def blows():
    out, t = np.zeros(N + SR), np.arange(SR // 2) / SR
    for (s, db, swell_ms), modes in zip(BLOWS, (LID_HOME_MODES, LID_SLAP_MODES, SET_DOWN_MODES)):
        body = sum(decaying(hz, level, t60, t) for hz, level, t60 in modes)
        add_at(out, s, decibels_to_gain(db) * body * (1 - np.exp(-t * 1000 / swell_ms)))
    return out[:N]


def scene():
    box = knocks() + blows() + bumps() + ticks() + band()
    mix = kitchen() + decibels_to_gain(-13) * room(box) + rubbing() + thumps() + box
    return mix[None]


def low_pass(x):
    return signal.sosfilt(signal.butter(12, 15840, fs=SR, output="sos"), x)


def record(dry):
    clipped = dry / (1 + np.abs(dry) ** 5) ** (1 / 5)
    edges = filtered(clipped - dry, lambda f: 1 / (1 + 1j * f / 9000) ** 2)
    mix = np.clip(dry + edges, -1, 1)
    return low_pass(mix)


dry = scene()
out = record(dry)
digitize_waveform(out)
```